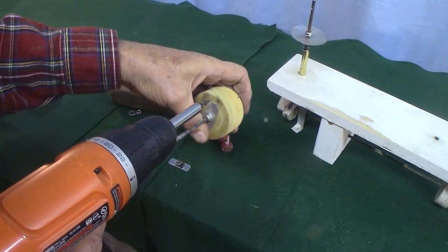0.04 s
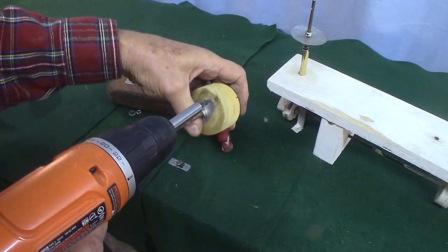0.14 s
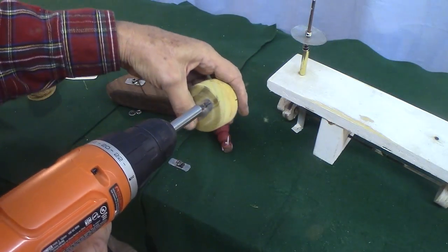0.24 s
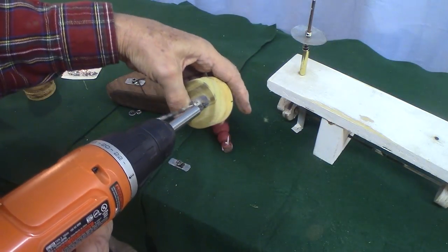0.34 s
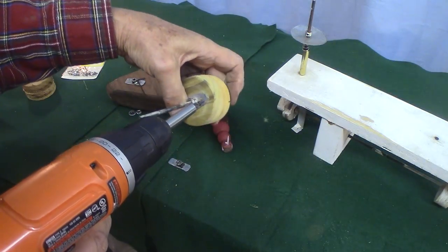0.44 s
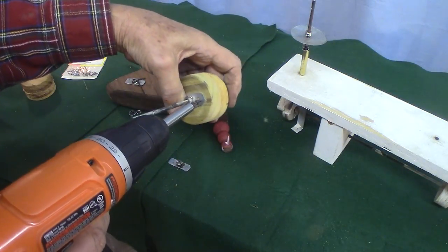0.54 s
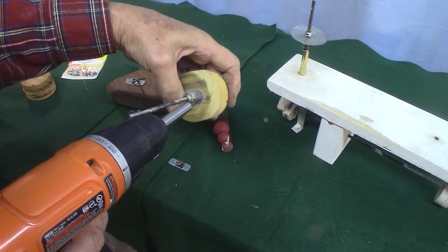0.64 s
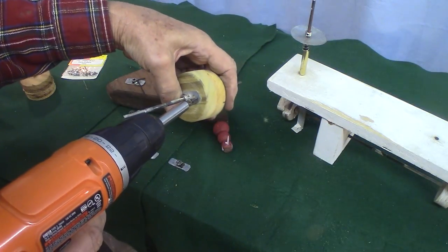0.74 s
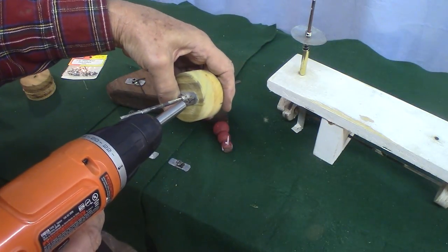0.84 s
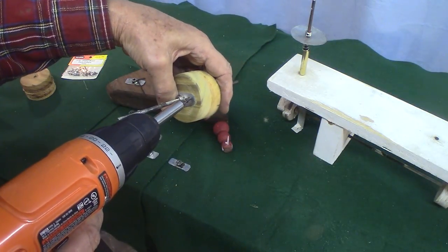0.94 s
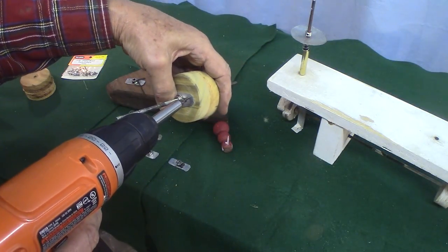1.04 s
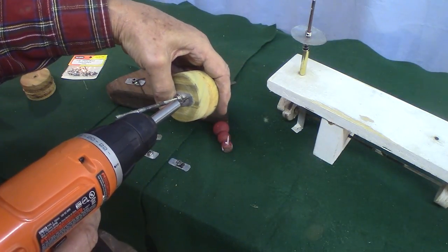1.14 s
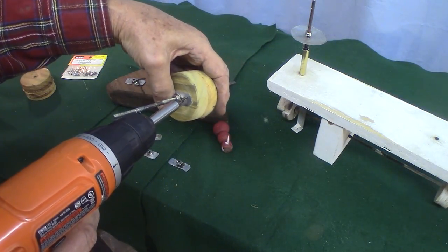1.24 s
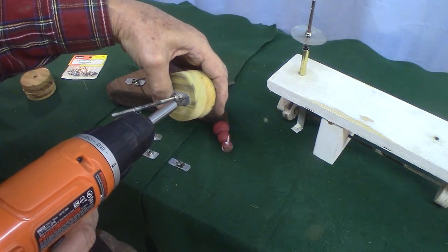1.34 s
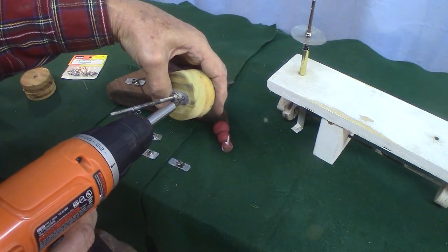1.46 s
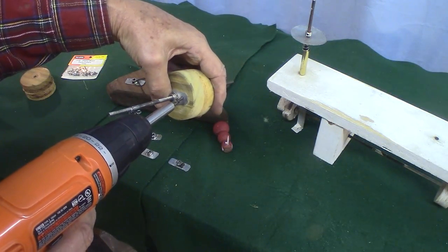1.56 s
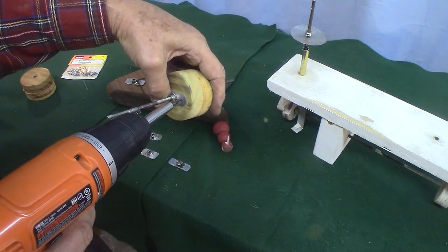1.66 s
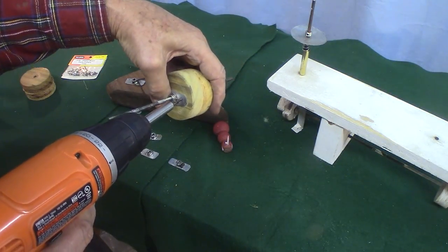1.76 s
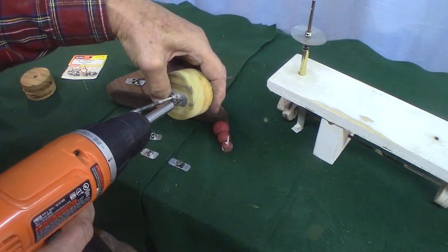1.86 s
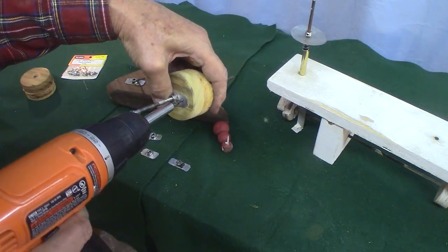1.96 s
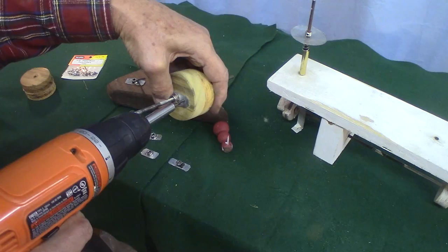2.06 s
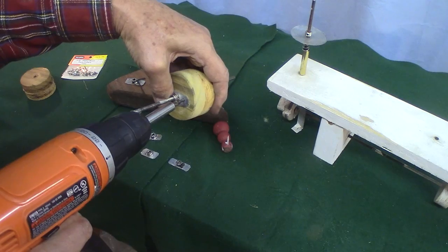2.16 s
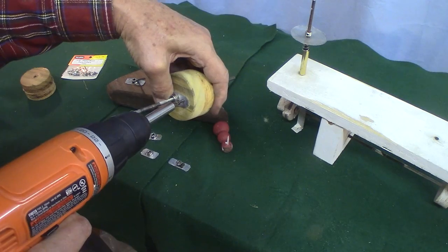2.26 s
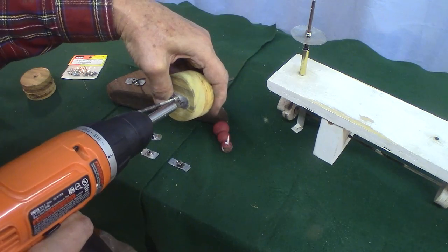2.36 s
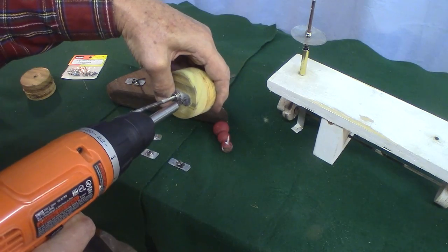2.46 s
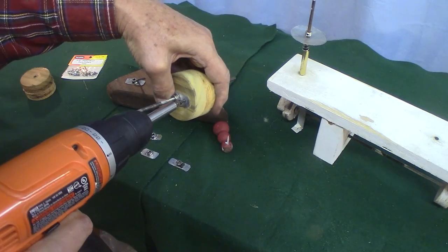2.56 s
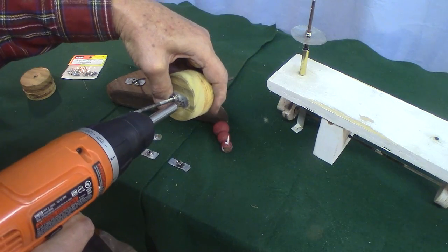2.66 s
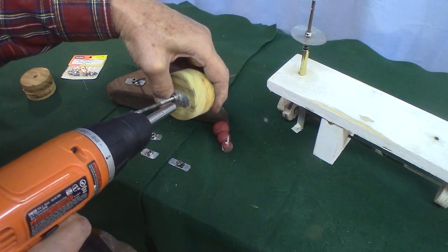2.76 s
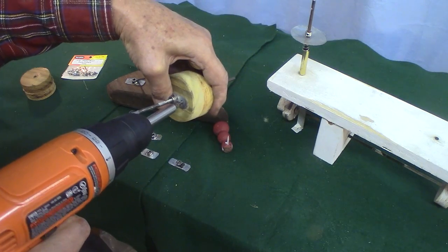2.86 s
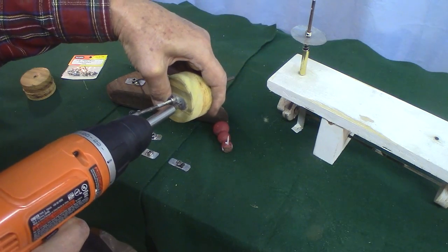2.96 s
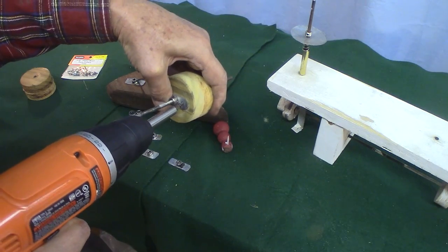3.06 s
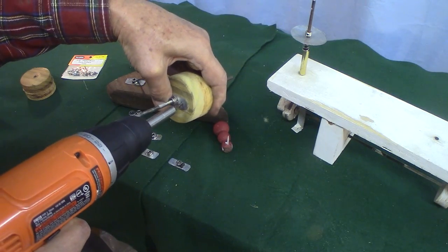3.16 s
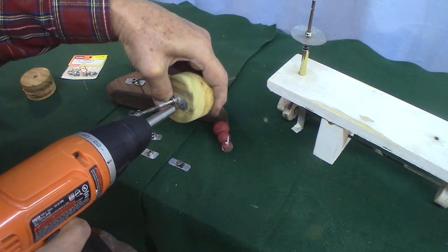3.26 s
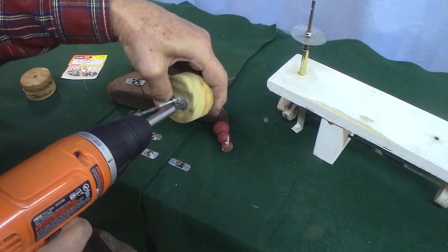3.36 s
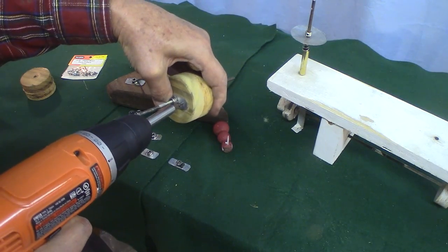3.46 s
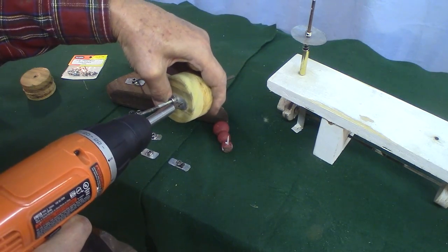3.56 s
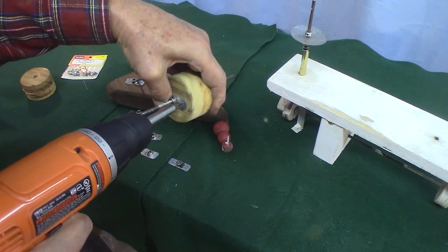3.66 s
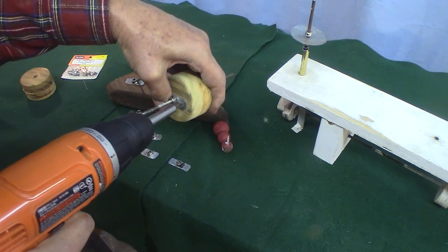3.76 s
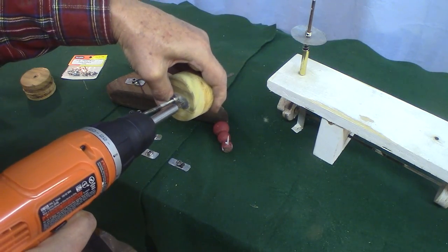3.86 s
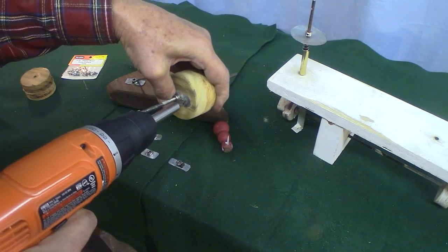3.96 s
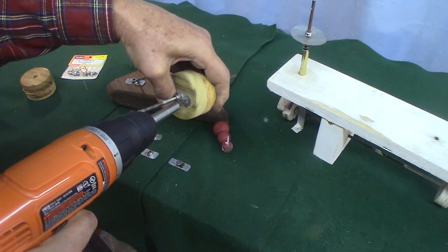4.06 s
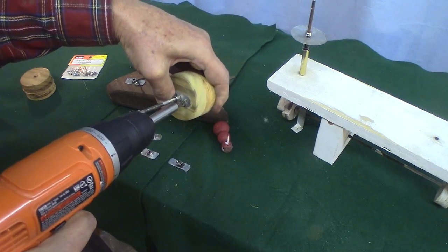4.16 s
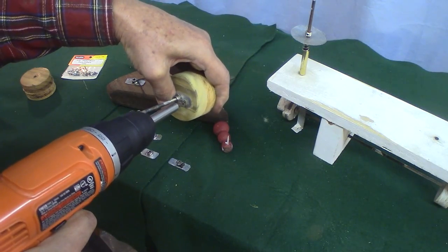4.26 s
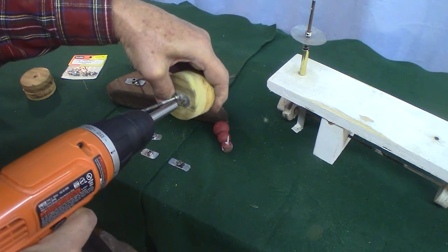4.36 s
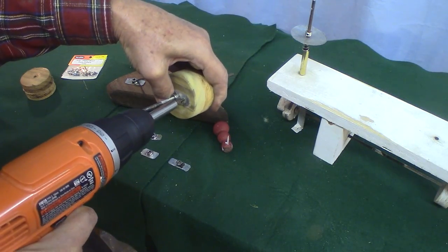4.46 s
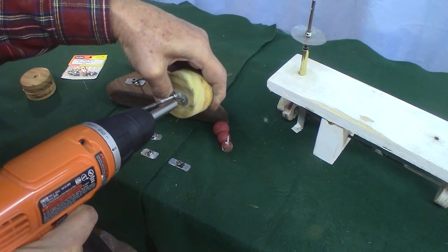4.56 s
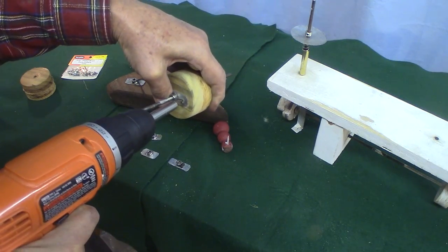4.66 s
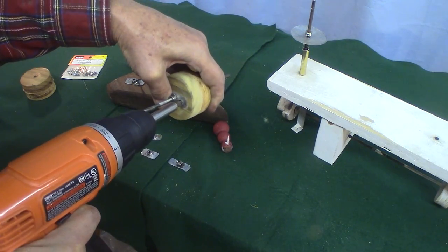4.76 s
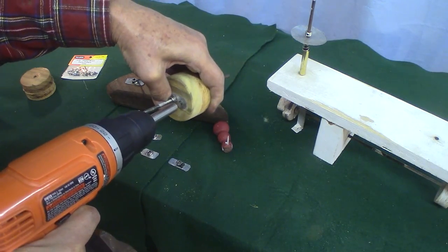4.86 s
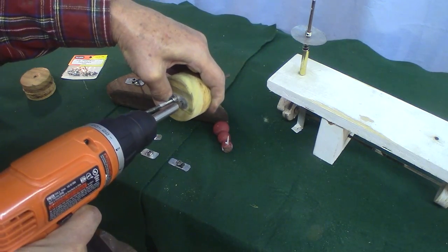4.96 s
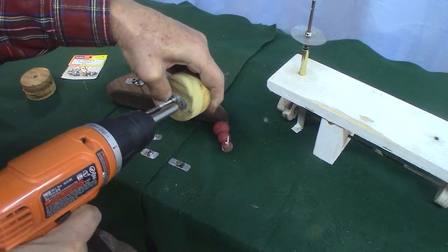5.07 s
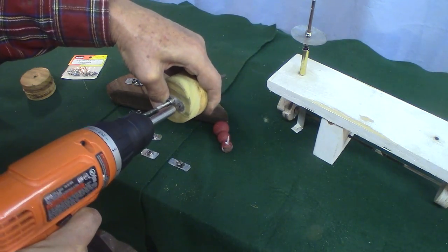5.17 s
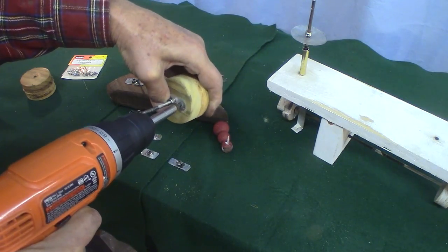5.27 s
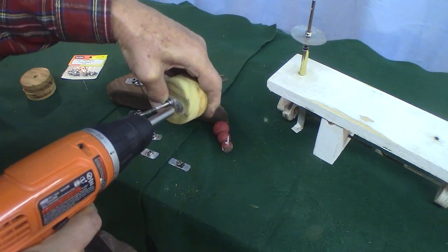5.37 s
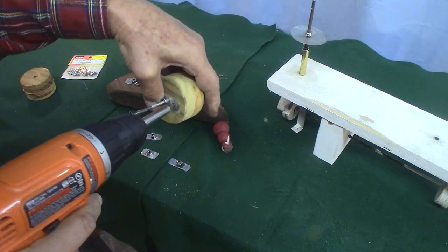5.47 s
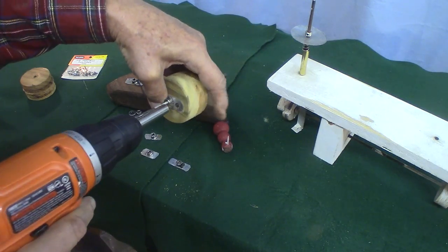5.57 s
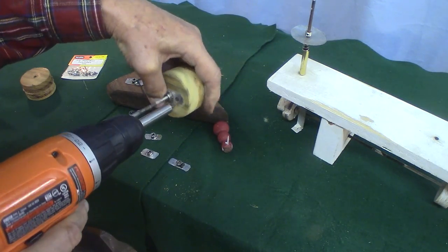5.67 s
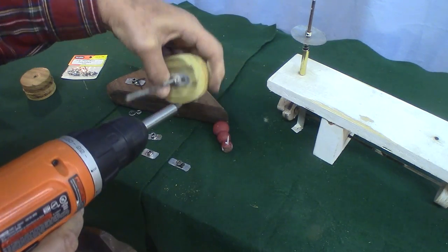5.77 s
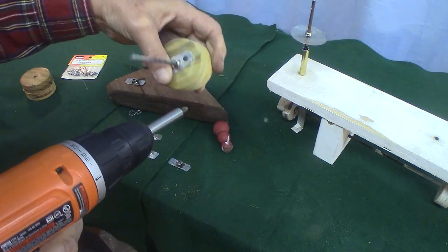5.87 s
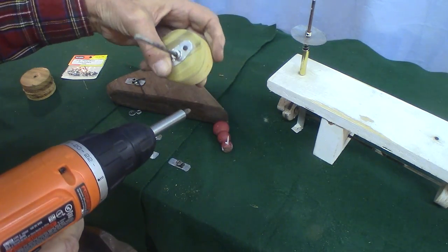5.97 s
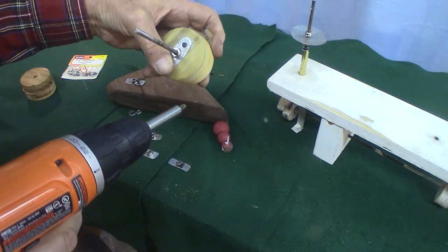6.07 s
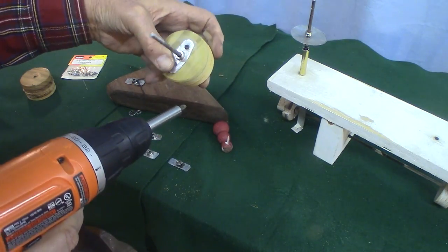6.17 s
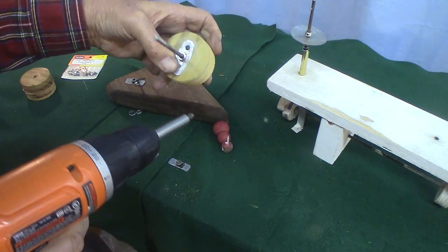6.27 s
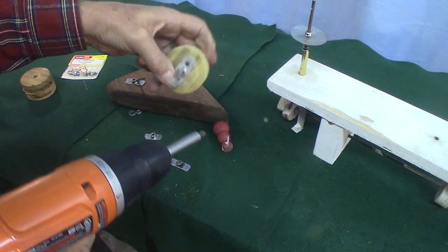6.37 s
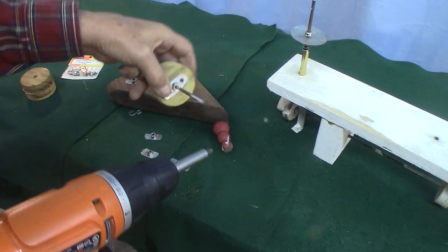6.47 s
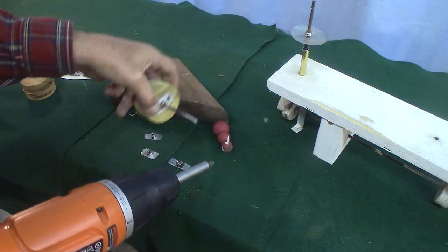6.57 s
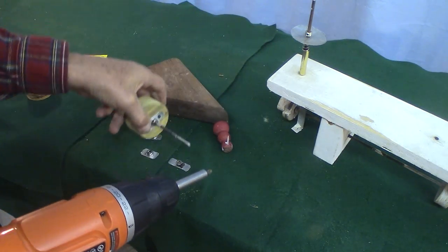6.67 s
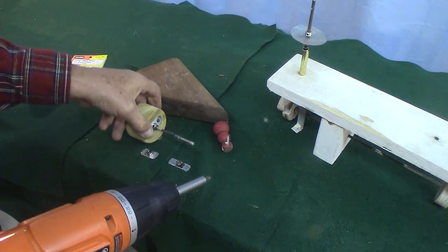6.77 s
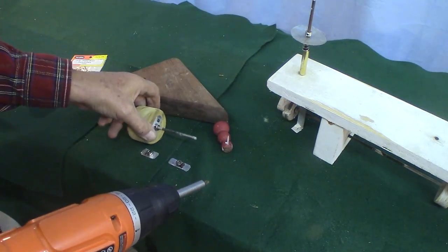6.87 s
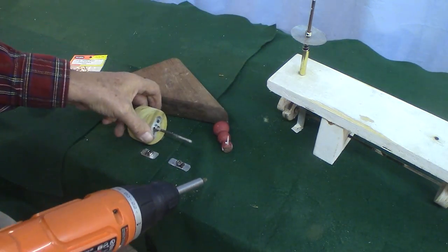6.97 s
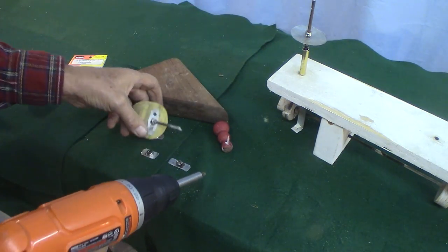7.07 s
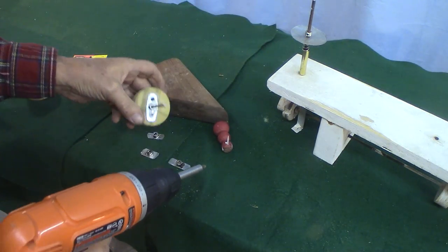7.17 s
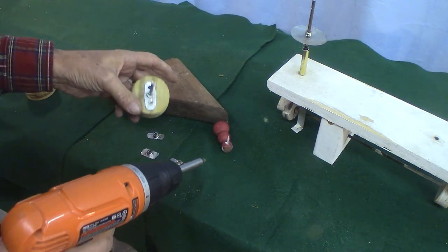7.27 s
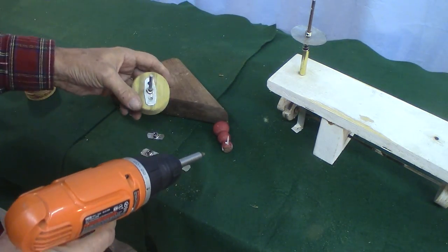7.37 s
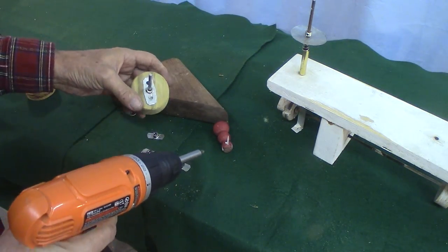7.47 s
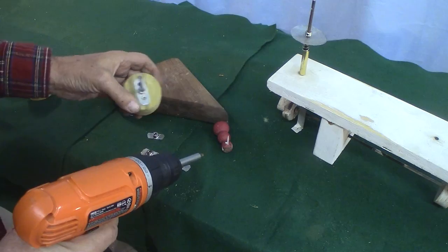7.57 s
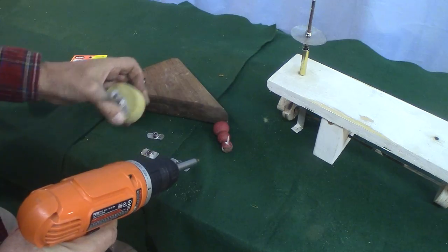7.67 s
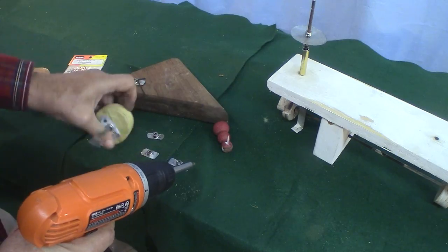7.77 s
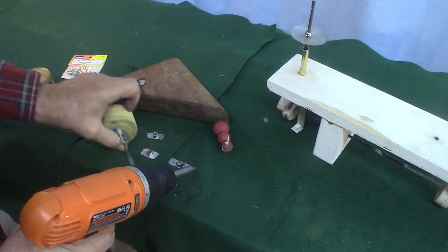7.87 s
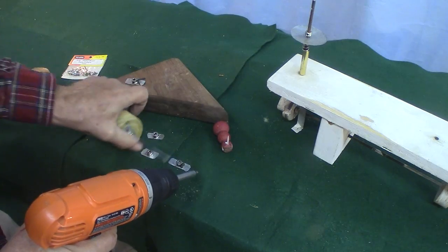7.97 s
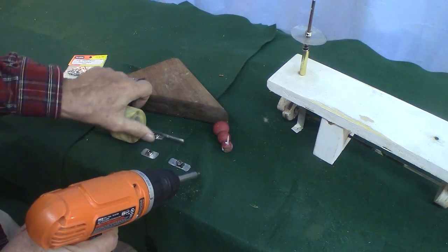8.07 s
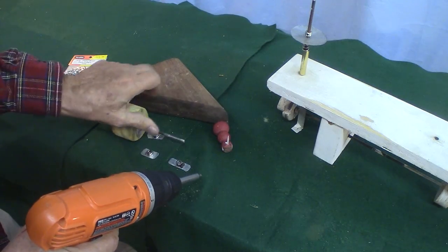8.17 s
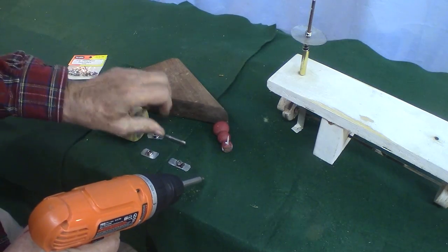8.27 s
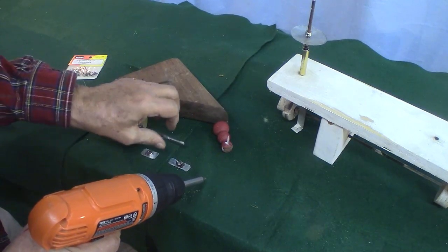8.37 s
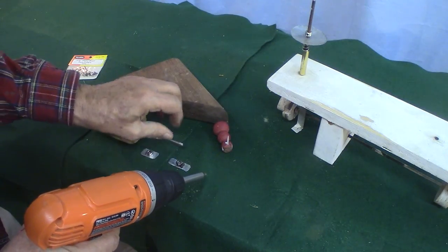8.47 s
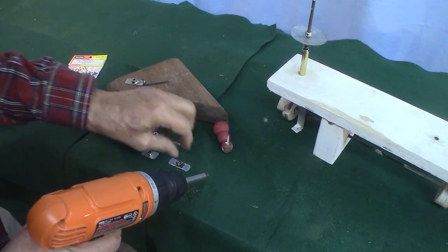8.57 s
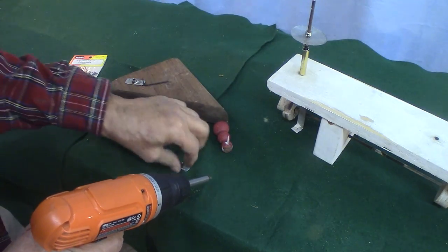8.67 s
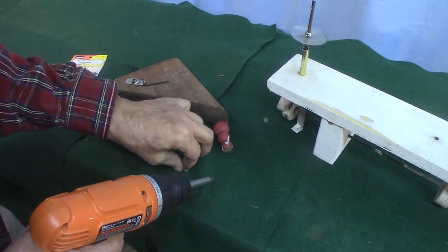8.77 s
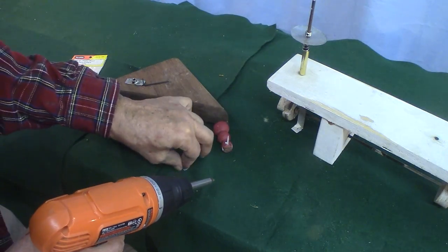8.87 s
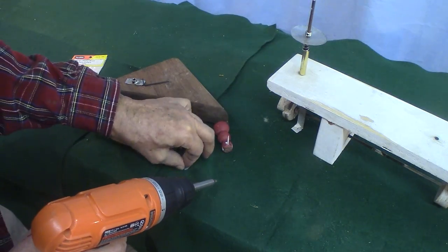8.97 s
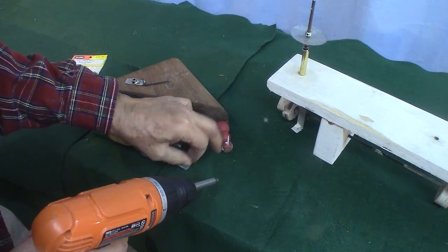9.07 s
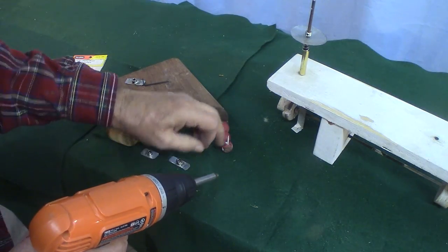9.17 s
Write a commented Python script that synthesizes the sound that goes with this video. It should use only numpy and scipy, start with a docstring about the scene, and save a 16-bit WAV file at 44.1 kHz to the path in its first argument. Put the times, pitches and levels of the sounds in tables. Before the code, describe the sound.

A small quiet room with a faint mains hum is heard through close microphones, the action slightly left. For the first two seconds there is soft sleeve rustle, a few light knocks on a wooden disc and faint creaks of a bit in a screw head. At about 2.2 seconds a trigger clicks and a cordless drill starts with a thin whistle, turning slowly and dipping briefly. By 3 seconds it rises to a loud, steady whine with hissing gears. From about 4.5 seconds it labours in pulses, squealing slightly as the screw binds, then brakes at 5.4 seconds with a few sharp clicks. From 6 seconds hands handle the disc with light knocks, scuffs and cloth rustle. Small steel parts tinkle between about 6.9 and 8.3 seconds, and the disc lands with a soft thud on the cloth-covered table at 8 seconds. A last faint tap comes near 9 seconds.

```python
"""A small quiet room, a close-set pair of microphones near a cloth-covered table.
A cordless drill drives a screw into a wooden disc held on the table: the trigger clicks, the speed
control whistles, the motor creeps, runs at full speed, labours as the thread binds, and brakes.
Before and after, hands knock the disc, small steel parts tinkle and cloth rustles.
Mains hum hangs in the room throughout."""
import sys
import numpy as np
from scipy import signal
from scipy.fft import rfft, irfft, next_fast_len
from scipy.io import wavfile
from scipy.ndimage import map_coordinates

SR = 44100
rng = np.random.default_rng(int(sys.argv[2]) if len(sys.argv) > 2 else 0)


def bounce(signal):
    """Save signal as a 16-bit WAV file at the path given by the first command-line argument."""
    frames = np.transpose(np.atleast_2d(signal))
    limited = np.clip(frames, -1, 1)
    pcm = np.round(limited * 32767).astype(np.int16)
    wavfile.write(sys.argv[1], SR, pcm)


N = 406602
TIME = np.arange(N) / SR

# spectrum of the room's air: f/Hz, relative density/dB
AIR_SPECTRUM = [(26, -39.5), (45, -1), (351, -0.5), (406, -0.5), (482, -6), (545, -5.5), (600, -4.5),
                (767, -5), (1080, -9), (1310, -9.5), (2670, -15.5), (11000, -25.5), (15500, -38.5)]
# overtones of the mains: f/Hz, level/dB
MAINS_HUM = [(120, -77), (240, -73.5), (360, -69.5), (480, -73.5), (600, -69.5), (840, -73.5), (960, -75.5),
             (1080, -78.5)]
# hands on cloth: t/s, relative dull level/dB, relative bright level/dB
RUSTLE_LEVELS = [(0, -55, -64.5), (0.5, -68, -70), (1, -80.5, -74.5), (2.2, -71, -65), (5.7, -56.5, -66),
                 (6.16, -54.5, -59.5), (6.35, -57.5, -68.5), (6.57, -64, -66), (6.75, -57, -65),
                 (6.91, -55.5, -68), (7.2, -48, -61), (7.35, -56.5, -67.5), (7.58, -54, -67.5),
                 (7.8, -48, -60), (8.17, -57, -61.5), (8.46, -54, -66.5), (8.91, -67.5, -69.5),
                 (9.22, -59.5, -64)]
# the dull sleeve and the bright cloth: f/Hz, relative density/dB
SLEEVE_SPECTRUM = [(150, -18), (400, 3), (900, -11.5), (2500, -14.5), (5000, -37)]
CLOTH_SPECTRUM = [(1500, -20.5), (3000, 4), (7500, 0.5), (11000, -15.5), (15000, -26)]
# scuffs of fingers and parts: peak t/s, fall time/s, level/dB, f/Hz, nominal width/Hz
SCUFFS = [(.16, .12, -57.5, 410, 60), (.2, .06, -68, 6000, 6000), (5.597, 0.041, -50, 2500, 1500),
          (5.611, 0.031, -48, 1110, 150), (6.041, .075, -60, 4930, 6000), (6.155, .05, -64.5, 8200, 2500),
          (7.035, .04, -53.5, 2190, 2000), (7.09, .03, -54, 1940, 100), (7.554, .033, -62.5, 2950, 1500),
          (7.61, .03, -49.5, 1940, 2490), (7.781, .038, -52, 3990, 8970), (7.827, .025, -48.5, 4956, 9000),
          (8.026, .032, -57.5, 2500, 4000), (8.26, .038, -58.5, 6020, 8030),
          (8.405, 0.042, -54.5, 7100, 2000), (8.4, .045, -52.5, 990, 2000),
          (8.918, .025, -64.5, 7730, 1800)]
# knocks and clicks of wood and plastic: t/s, relative level/dB, ring f/Hz, snap trim/dB
CONTACTS = [(0.539, -40.5, 900, -14), (0.626, -38, 1070, -9), (1.441, -44.5, 1160, -3),
            (1.455, -48, 1130, 1), (1.47, -46.5, 1100, -0.5), (1.864, -41, 600, -2.5),
            (2.22, -38, 2700, 4.5), (5.478, -27.5, 2830, -6), (5.541, -43.5, 4770, -15),
            (5.558, -39, 4350, -15), (5.624, -33.5, 2990, -7.5), (5.666, -32, 1650, -23),
            (6.075, -43, 1560, -7.5), (6.307, -44, 2190, -10), (6.394, -43.5, 1700, -9),
            (6.587, -42, 1356, -0.5), (6.737, -38, 700, -23), (6.778, -33, 420, -20),
            (6.779, -35.5, 1250, -12.5), (6.796, -39.5, 504, -9.5), (6.865, -38.5, 875, -2),
            (6.882, -35, 2010, -12.5), (6.995, -40, 2230, -7), (7.214, -33.5, 2600, -11),
            (7.524, -43, 2490, -17), (7.6, -41, 2440, -27), (7.659, -30.5, 2200, -10.5),
            (7.77, -39.5, 2580, -18), (7.832, -34.5, 2800, -14), (7.842, -30.5, 1520, -18.5),
            (7.933, -43, 1580, -23), (8.015, -41.5, 506, -14.5), (8.145, -36.5, 4210, -4),
            (8.159, -40, 930, -17), (8.206, -43, 3900, -12), (8.951, -41, 1610, -15)]
# the bit creaks in the screw head: peak t/s, level/dB
BIT_CREAKS = [(.8, -63), (.9, -62), (1.02, -63), (1.18, -58), (1.45, -50), (1.68, -58.5)]
# the speed control chops the current: t/s, f/Hz, level/dB
CHOPPER_TRACK = [(2.243, 1318, -65), (2.248, 1347, -36), (2.257, 1345, -45), (2.261, 1423, -31),
                 (2.273, 1430, -35), (2.276, 1560, -30), (2.281, 1560, -28), (2.284, 1465, -29),
                 (2.385, 1452, -31), (2.42, 1470, -43), (2.6, 1480, -52), (2.77, 1470, -33.5),
                 (2.8, 1490, -29.5), (2.85, 1510, -22.5), (2.87, 1520, -26), (2.89, 1500, -62.5)]
# its partials: harmonic number, relative level/dB
CHOPPER_HARMONICS = [(1, 1), (2, -8), (3, -13.5), (4, -21), (5, -32), (6, -26), (8, -40.5)]
# motor shaft: t/s, speed/(turns per s)
SHAFT_SPEED = [(2.27, 95), (2.37, 198), (2.41, 223), (2.44, 222), (2.69, 165), (2.75, 157), (2.78, 165),
               (2.81, 205), (2.86, 345), (2.9, 400), (2.96, 452), (3.01, 466), (3.1, 469), (4.5, 464),
               (4.64, 458), (5.04, 456), (5.11, 435), (5.18, 418), (5.22, 421), (5.27, 435), (5.32, 431),
               (5.36, 398), (5.45, 315)]
# resonances of the housing, gear teeth and brushes: f/Hz, width/Hz, relative level/dB
HOUSING_MODES = [(368.5, 99, -9.5), (668, 200, -13.5), (950, 110, -5), (1104, 85, 1.5), (1274, 190, -0.5),
                 (1503, 270, -4.5), (1830, 230, -7.5), (2090, 330, -18)]
TOOTH_MODES = [(2282, 140, -2.5), (2698, 270, 2.5), (3830, 450, 2.5), (4620, 500, 0), (5760, 770, -3),
               (7270, 700, -3.5), (8600, 790, -5), (9300, 420, -7), (10200, 2900, -12.5), (12460, 470, -12),
               (13960, 2500, -23.5)]
BRUSH_MODES = [(2970, 120, -0.5), (3620, 110, 1.5), (4450, 240, -5.5), (7235, 310, 0), (9450, 380, 0.5),
               (10860, 440, -6.5), (12400, 330, -8)]
# ring of the brushes at full power: t/s, level/dB
BRUSH_LEVELS = [(2.3, -41), (2.39, -29), (2.56, -31), (2.66, -38.5), (2.77, -39), (2.83, -30.5),
                (2.96, -27), (4.5, -25), (5.1, -28), (5.38, -29.5)]
# whine of the rotor poles at full power: t/s, level/dB, swing with each chuck turn/dB
POLE_WHINE = [(2.27, -54, 0), (2.39, -27, 1), (2.55, -25.5, 1.5), (2.63, -37, .1), (2.8, -32, .1),
              (2.92, -24, 1.2), (2.98, -27, 1.2), (4, -26, 1.5), (4.4, -19.5, 1.5), (4.65, -15.5, 2.5),
              (4.78, -18, 2.5), (4.98, -17.5, 3.5), (5.13, -18, 6.5), (5.25, -20, 6.5), (5.38, -20, 4)]
# tones tied to the shaft: multiple of its rate, relative level/dB
SHAFT_ORDERS = [(.763, 0.5), (1, -3.5), (3.82, -6.5), (4, -4.5), (5, -3), (8, -8), (9, -7.5), (10, -7),
                (12, -9), (13, -10.5), (16, -12), (18, -10.5), (20, -11.5)]
# a steel key touches the disc, thin steel plates clink: t/s, relative level/dB, brightest f/Hz
KEY_TOUCHES = [(6.866, -38, 5300), (7.02, -45, 5700), (7.1786, -35, 9700), (7.193, -41, 10500),
               (7.214, -26, 9500), (7.833, -41, 5740), (8.148, -40.5, 5400)]
PLATE_TOUCHES = [(7.768, -48, 9900), (8.207, -48, 9800), (8.2396, -42, 11500), (8.2526, -37.5, 4680),
                 (8.2645, -44, 5100), (8.2846, -42, 11500), (8.3046, -49.5, 4690)]
# how key and plates ring: f/Hz, relative level/dB, t60/s
KEY_MODES = [(2660, -9, .05), (3848, -17, .08), (5740, -6.5, 0.19), (7994, -6, 0.082), (8190, 0, 0.086),
             (10080, -4, 0.081), (13500, -7, .12)]
PLATE_MODES = [(4620, -6, 0.23), (5900, -2, 0.045), (8100, -19, .06), (9800, -6, 0.4), (10540, -4, 0.098),
               (11540, 0, 0.14), (12510, -4, .15), (13440, -12, .05)]
# the disc is set down and rocks: t/s, level/dB, f/Hz, t60/s
DISC_THUDS = [(7.99, -34, 132, 0.17), (8.018, -33, 154, 0.049)]
# the drill's direct sound at the microphones: f/Hz, left minus right/dB
DRILL_BALANCE = [(100, 0), (400, 0), (700, .5), (1200, .4), (2400, 2.3), (4500, 1.4), (8500, 3.5),
                 (13000, 2.9)]
# reverberation of the room: f/Hz, t60/s
ROOM_DECAY = [(200, 0.07), (2000, .3), (10000, 0.17)]

ON_S, OFF_S, STOP_S = 2.244, 5.39, 5.66  # trigger pulled, trigger let go, gears at rest
RISE_S, BRAKE_S = 0.073, 0.046  # the noise builds up; the brake bites
RUN = slice(round(2.2 * SR), round(5.7 * SR))  # the samples that span the motor's run
FULL_SPEED, GEAR_RATIO = 466, 42  # shaft turns per s; shaft turns per chuck turn


def amp(db):
    return 10 ** (np.asarray(db) / 20)


def unit(x):
    return x / np.sqrt(np.mean(x ** 2) + 1e-20)


def along(points, hz):
    """Interpolate (f/Hz, value) points on a log frequency axis."""
    f, values = np.transpose(points)
    return np.interp(np.log(hz + 1), np.log(f + 1), values)


def curves(rows):
    """One value per sample for each column after the time."""
    times, *columns = np.transpose(rows)
    return [np.interp(TIME, times, column) for column in columns]


def during(start_s, end_s):
    return (TIME > start_s) & (TIME < end_s)


def wobble(rate, size=N):
    """A smooth random curve, rate knots a second."""
    return map_coordinates(rng.standard_normal(int(size * rate / SR) + 4), [TIME[:size] * rate])


def filtered(x, response):
    """Pass x through a complex response of frequency."""
    size = next_fast_len(N + SR // 2)
    return irfft(rfft(x, size) * response(np.fft.rfftfreq(size, 1 / SR)), size)[..., :N]


def band(x, hz, width_hz):
    """A resonance applied twice, for steep skirts; rms 1."""
    b, a = signal.iirpeak(hz, hz / width_hz, SR)
    return unit(signal.lfilter(b, a, signal.lfilter(b, a, x)))


def resonant_noise(modes, drive=1):
    """Noise, scaled by drive, rings modes of (f/Hz, width/Hz, level/dB); rms 1."""
    def response(f):
        return sum((-1) ** k * amp(db) * 1j * f * width / (hz * hz - f * f + 1j * f * width)
                   for k, (hz, width, db) in enumerate(modes))
    return unit(filtered(drive * rng.standard_normal(N), response))


def stereo_noise(spectrum, side_db):
    """Noise of rms 1, nearly alike at both microphones."""
    mid, side = filtered(rng.standard_normal((2, N)), lambda hz: amp(along(spectrum, hz)))
    return unit(np.array([mid + amp(side_db) * side, mid - amp(side_db) * side]))


def tones(turns, orders, flutter_db, rate):
    """Sines at (multiple, level/dB) of a cycle during the run, each fluttering by itself."""
    out, turns = np.zeros(N), turns[RUN]
    for multiple, db in orders:
        rms = amp(db + flutter_db * wobble(rate, len(turns)))
        out[RUN] += rms * np.sqrt(2) * np.sin(2 * np.pi * (multiple * turns + rng.random()))
    return out


def room_tone():
    """Steady air noise and the overtones of the mains hum."""
    hum = sum(amp(db + 0.65 * wobble(2.9)) * np.sqrt(2) * np.sin(2 * np.pi * (hz * TIME + rng.random()))
              for hz, db in MAINS_HUM)
    return amp(-59) * stereo_noise(AIR_SPECTRUM, side_db=-9.5) + hum


def rustle():
    """Sleeve and fingers brush the cloth in grainy strokes."""
    dull_db, bright_db = curves(RUSTLE_LEVELS)
    dull = amp(dull_db - 4.5 + 2.3 * wobble(30)) * stereo_noise(SLEEVE_SPECTRUM, side_db=-12)
    bright = amp(bright_db - 6 + 2.24 * wobble(80)) * stereo_noise(CLOTH_SPECTRUM, side_db=-11)
    return dull + bright


def scrapes(creak_s=0.026, creak_hz=1084, creak_width_hz=150):
    """Fingers and parts scuff, the bit creaks: bands of grainy noise that swell and die away."""
    out, t = np.zeros(N + SR), np.arange(-SR // 8, SR // 4) / SR
    creaks = [(s, creak_s, db, creak_hz, creak_width_hz) for s, db in BIT_CREAKS]
    for s, fall_s, db, hz, width_hz in SCUFFS + creaks:
        grit = amp(3.8 * wobble(250, len(t))) * rng.standard_normal(len(t))
        swell = np.where(t < 0, np.exp(-(t / (0.7 * fall_s)) ** 2), np.exp(-t / fall_s))
        out[round(s * SR) - SR // 8:][:len(t)] += amp(db) * band(grit, hz, 1.3 * width_hz) * swell
    return out[:N]


def knocks(ring_t60=0.042, snap_t60=0.031):
    """Wood and plastic make contact: a rough ring at the object's pitch and a bright snap."""
    out, t = np.zeros(N + SR), np.arange(SR // 4) / SR
    for s, db, hz, snap_db in CONTACTS:
        noise = rng.standard_normal((2, len(t)))
        envelope = amp(-60 * t / ring_t60) * (1 - np.exp(-t / 0.0004))
        ring = 0.48 * np.sin(2 * np.pi * hz * t) + 0.4 * band(noise[0], hz, 0.87 * hz)
        snap = 0.69 * amp(snap_db - 60 * t / snap_t60) * band(noise[1], 3170, width_hz=4200)
        out[round(s * SR):][:len(t)] += amp(db) * (envelope * ring + snap)
    return out[:N]


def speed_control():
    """The chopped current whistles while the motor creeps."""
    hz, db = curves(CHOPPER_TRACK)
    whistle = amp(db) * tones(np.cumsum(hz) / SR, CHOPPER_HARMONICS, flutter_db=4, rate=68)
    return whistle * during(CHOPPER_TRACK[0][0], CHOPPER_TRACK[-1][0])


def gears(turns, bind, swing_db, rattle_db, hiss_db):
    """The housing rattles, the teeth hiss and the gear cage churns, loudest as the thread binds."""
    rattle = resonant_noise(HOUSING_MODES, drive=amp(1.5 * wobble(90)))
    rattle *= amp(rattle_db + 0.61 * bind + 0.71 * wobble(12))
    # teeth strike harder once a turn
    beat = 1 + 0.16 * np.cos(2 * np.pi * turns) + 0.11 * np.cos(2 * np.pi * 0.763 * turns)
    hiss = resonant_noise(TOOTH_MODES, drive=beat * amp(0.99 * wobble(200)))
    hiss *= amp(hiss_db + bind + 0.4 * wobble(15))
    churn = resonant_noise([(1286, 68, 0), (2702, 190, 0)])
    churn *= amp(hiss_db - 15.5 + 0.6 * swing_db + 8.5 * bind)
    return rattle + hiss + churn


def brushes(power_db):
    """The motor's brushes rub and ring in narrow, high bands."""
    level_db = curves(BRUSH_LEVELS)[0] + 1.3 * power_db
    return amp(level_db + 1.3 * wobble(25)) * resonant_noise(BRUSH_MODES)


def motor_tones(turns, speed, speed_db, whine_db, swing_db, housing_hz=945):
    """Three rotor poles whine, the shaft's orders grow with speed and the loaded shaft hums."""
    whine = amp(whine_db) * tones(turns, [(3, 0)], flutter_db=1.5, rate=39)
    octave = amp(-37) * tones(turns, [(6, 0)], flutter_db=4.5, rate=60)
    orders_db = np.maximum(-31 + 3.7 * speed_db, -52)
    orders = amp(orders_db) * tones(turns, SHAFT_ORDERS, flutter_db=1, rate=22)
    strain = amp(-51 + 2.6 * swing_db) * tones(turns, [(1, 0)], flutter_db=2.5, rate=20)
    # the second order sounds only near a housing resonance
    tuning = 1 / (1 + ((2 * speed - housing_hz) / 30) ** 2)
    second = amp(orders_db + 1) * tuning * tones(turns, [(2, 0)], flutter_db=2, rate=25)
    return whine + octave + orders + strain + second


def drill(tightest_s=4.662):
    """The motor turns the screw through its gears; the thread binds once a chuck turn and slows it."""
    speed = curves(SHAFT_SPEED)[0]
    speed_db = 20 * np.log10(speed / FULL_SPEED)
    power_db = curves([(ON_S, -14), (ON_S + RISE_S, 0), (OFF_S, 0),
                       (OFF_S + BRAKE_S, -22), (STOP_S, -34.5)])[0]
    running = during(ON_S, STOP_S)
    whine_db, swing_db = curves(POLE_WHINE)
    chuck_turns = np.cumsum(speed) / SR / GEAR_RATIO
    chuck_turns -= chuck_turns[round(tightest_s * SR)]
    bind = np.cos(2 * np.pi * chuck_turns)
    turns = np.cumsum(speed * (1 + 0.0012 * wobble(30) - 0.0016 * swing_db * bind)) / SR
    rattle_db = -18.5 + 1.1 * speed_db + power_db
    hiss_db = -18 + 1.51 * speed_db + 1.3 * power_db
    noise = gears(turns, bind, swing_db, rattle_db, hiss_db) + brushes(power_db)
    tonal = motor_tones(turns, speed, speed_db, whine_db + swing_db * bind, swing_db)
    tonal += screw_squeal(turns, chuck_turns)
    tonal *= amp(2.2 * power_db)  # tones die faster than noise
    body = (noise + tonal) * running + speed_control()
    airborne = filtered(body, lambda hz: 1 / (1 + (300 / (hz + 1)) ** 7))  # a small housing: no bass
    table_rumble = amp(hiss_db - 37.5) * resonant_noise([(227, 60, 1), (40, 54, -8)])
    return airborne + table_rumble * running


def screw_squeal(turns, chuck_turns, lead_turns=0.24):
    """Late in the drive the thread squeals once a chuck turn, just ahead of its tightest point."""
    level_db = -22.5 + 14 * (np.cos(2 * np.pi * (chuck_turns + lead_turns)) - 1)
    return amp(level_db) * tones(turns, [(5.65, 0)], flutter_db=4, rate=70) * during(4.6, 5.24)


def tinkles(touches, modes, db_per_octave):
    """Each touch ticks and rings the steel's modes, weaker away from its brightest pitch."""
    out, t = np.zeros(N + SR), np.arange(SR // 3) / SR
    for s, db, brightest_hz in touches:
        ring = np.zeros(len(t))
        for hz, mode_db, t60 in modes:
            struck_db = mode_db + rng.normal(0, 3.8) - db_per_octave * abs(np.log2(hz / brightest_hz))
            ring += amp(struck_db - 60 * t / t60) * np.sin(2 * np.pi * hz * t)
        tick = 0.5 * amp(-60 * t / 0.021) * band(rng.standard_normal(len(t)), brightest_hz, 6400)
        out[round(s * SR):][:len(t)] += amp(db - 9) * (ring + tick)
    return out[:N]


def thuds():
    """The disc lands softly on the table and rocks: low, damped tones."""
    out, t = np.zeros(N + SR), np.arange(SR // 4) / SR
    for s, db, hz, t60 in DISC_THUDS:
        envelope = amp(db - 60 * t / t60) * (1 - np.exp(-t / 0.0014))
        out[round(s * SR):][:len(t)] += envelope * np.sin(2 * np.pi * hz * t)
    return out[:N]


def walls(x, delay_samples=300):
    """The room answers a moment later, each frequency dying at its own speed."""
    hz, t, spectra = signal.stft(rng.standard_normal((2, SR // 2)), SR, nperseg=256)
    apart = 0.9 * np.clip(hz / 900, 0, 1)[:, None]  # radians: close-set microphones hear the bass alike
    spectra[1] = np.cos(apart) * spectra[0] + np.sin(apart) * spectra[1]
    decay = amp(-60 * t / along(ROOM_DECAY, hz)[:, None])
    tail = signal.istft(spectra * decay, SR, nperseg=256)[1]
    delayed = np.pad(x, (delay_samples, 0))[None]
    return signal.fftconvolve(delayed, tail / np.linalg.norm(tail[0]), axes=1)[:, :N]


def scene():
    """Drill and hands close by and left of centre, the room behind them."""
    tool = drill()
    hands = knocks() + thuds() + scrapes()
    hands += tinkles(KEY_TOUCHES, KEY_MODES, db_per_octave=16.5)
    hands += tinkles(PLATE_TOUCHES, PLATE_MODES, db_per_octave=20)
    leftward = np.array([[0.5], [-0.5]])
    direct = filtered(tool, lambda hz: amp(along(DRILL_BALANCE, hz) * leftward))
    direct += hands * amp(1.2 * leftward)
    return direct + walls(amp(-15) * tool + amp(-10.5) * hands) + rustle() + room_tone()


def record(dry, ceiling=0.95, low_hz=55, high_hz=14900, limit_hz=15700):
    """The recorder rounds peaks near full scale, thins the deepest bass and cuts the highest treble."""
    def response(hz):
        return (hz < limit_hz) / (1 + (hz / high_hz) ** 40) / (1 + (low_hz / (hz + 1)) ** 2)
    rounded = dry / (1 + np.abs(dry / ceiling) ** 6) ** (1 / 6)
    return filtered(rounded, response)


dry = scene()
out = record(dry)
bounce(out)
```